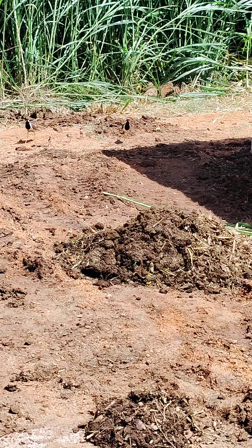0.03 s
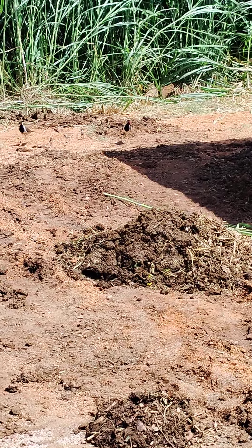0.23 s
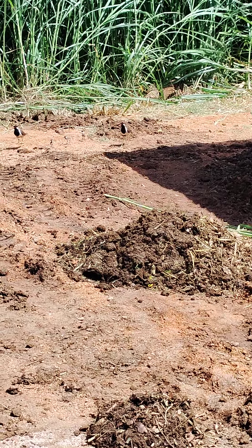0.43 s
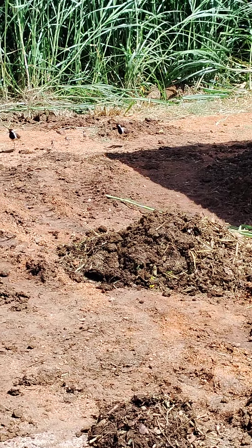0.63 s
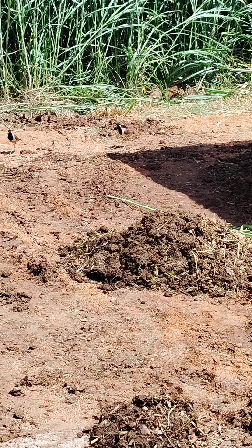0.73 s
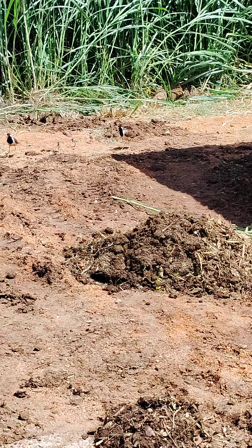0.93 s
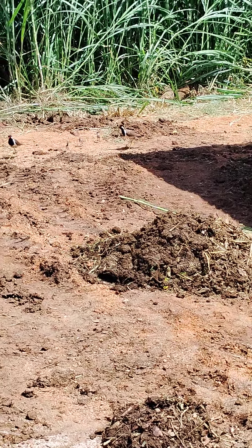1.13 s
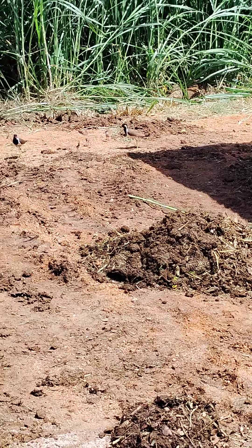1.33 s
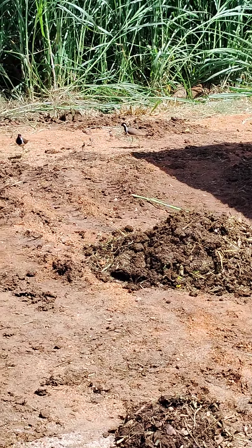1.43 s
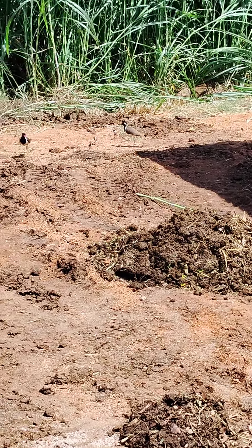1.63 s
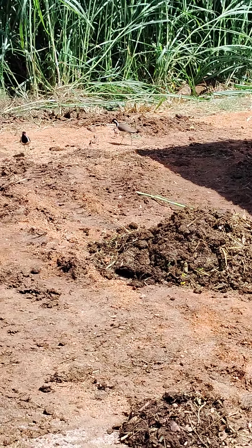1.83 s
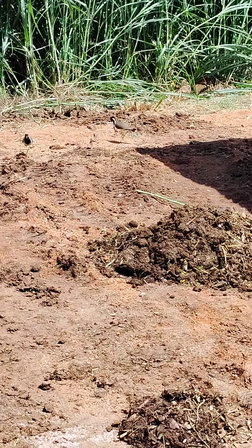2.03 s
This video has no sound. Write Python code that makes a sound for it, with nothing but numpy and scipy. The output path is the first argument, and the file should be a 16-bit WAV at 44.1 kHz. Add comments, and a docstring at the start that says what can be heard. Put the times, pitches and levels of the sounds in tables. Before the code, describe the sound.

Sharp little bird chirps come in small clusters outdoors, above faint steady background noise.

```python
"""First come a far rumble, a faint machine hum and light air on the microphone.
Then red-wattled lapwings call on bare ground in front of a tall green field: short, sharp "kip" notes
that hold their pitch and then break downwards, and one longer whine. Each call is a stack of
harmonics (tones at 1, 2, 3... times its pitch), and the stems scatter it back."""
import sys
import numpy as np
from scipy import signal
from scipy.fft import rfft, irfft
from scipy.io import wavfile

SR = 44100
rng = np.random.default_rng(int(sys.argv[2]) if len(sys.argv) > 2 else 0)


def transcribe(u):
    """Save the signal u as a 16-bit wav file named by the first command-line argument.

    u: samples, shape (n,) or (channels, n), limited to [-1, 1]; the rate is SR.
    q: integer samples, one column per channel.
    """
    v = np.clip(np.atleast_2d(u).T, -1, 1)
    q = np.round(v * 32767).astype(np.int16)
    wavfile.write(sys.argv[1], SR, q)


N = 92036
T = np.arange(N) / SR


def from_db(db):
    """Turn decibels into a number to multiply by."""
    return 10 ** (np.asarray(db) / 20)


def unit_power(x):
    """Scale a signal to an average power of one."""
    return x / np.sqrt(np.mean(x ** 2) + 1e-20)


def at_hz(table, hz):
    """Read between a table's rows, with every octave equally wide."""
    freqs, values = np.transpose(table)
    return np.interp(np.log(hz), np.log(freqs), values)


def panned(db):
    """Left and right gains that make the left side louder by db."""
    gains = from_db(np.array([[.5], [-.5]]) * db)
    return gains / np.sqrt(np.mean(gains ** 2, axis=0))


def drift(rate_hz):
    """A smooth random wobble, about one in size."""
    smooth = signal.butter(2, rate_hz, fs=SR, output="sos")
    return unit_power(signal.sosfilt(smooth, rng.standard_normal(2 * N))[N:])


def noise_band(low, high, alike):
    """Stereo noise between two frequencies; alike runs from 0 (unrelated sides) to 1 (the same)."""
    band = signal.butter(2, [low, min(high, SR / 2 - 1)], "band", fs=SR, output="sos")
    mid, side = signal.sosfilt(band, rng.standard_normal((2, N + SR // 2)))[:, -N:]
    return np.sqrt(1 + alike) * mid + np.sqrt(1 - alike) * side * [[1], [-1]]


def add(out, start, sound):
    """Mix a sound in at its start time in seconds."""
    i = int(start * SR)
    out[:, i:i + sound.shape[1]] += sound[:, :N - i]


def right_later(sound, lag_samples):
    """Let a sound reach the right microphone later."""
    return np.array([sound[0], np.interp(T - lag_samples / SR, T, sound[1])])


# The tone of the air. Each row: frequency in Hz, relative level in dB.
AIR_TONE = [(15, -45), (25, -13.5), (281, -2), (433, -8.5), (495, 0), (537, -8.5), (722, -9.5), (895, -12),
            (1200, -6), (1900, -10), (2300, -12), (2850, -16.5), (5010, -16), (10900, -32), (15500, -46)]
# Where the air sits. Each row: frequency in Hz, left over right in dB.
AIR_BALANCE = [(60, 5), (200, -1.5), (700, 0), (1300, -6), (2400, -5), (4400, -3), (8000, 1)]
# How alike its two sides are. Each row: frequency in Hz, likeness from 0 to 1.
AIR_LIKENESS = [(30, .4), (60, .45), (130, .86), (290, .95), (640, .91), (1410, .55), (3100, .1),
                (8000, .05)]


def far_rumble(level_db=-47, waver_db=2.03):
    """Far rumble and hiss in half-octave bands, each wavering a little."""
    out, edges = 0, 20 * 2 ** np.arange(0, 10.1, .5)
    for low, high in zip(edges, edges[1:]):
        hz = np.sqrt(low * high)
        gain = from_db(at_hz(AIR_TONE, hz) + waver_db * drift(3.3))
        band = noise_band(low, high, at_hz(AIR_LIKENESS, hz))
        out = out + gain * panned(at_hz(AIR_BALANCE, hz)) * band
    return from_db(level_db) * unit_power(out)


# The tones of the hum. Each row: pitch in Hz, level in dB.
HUM_TONES = [(301.5, -70), (490, -61)]


def machine_hum(waver_db=1.5, pitch_wobble=0.0018):
    """A far machine hums faintly, wavering in level and pitch."""
    out = 0
    for hz, db in HUM_TONES:
        gain = from_db(db + waver_db * drift(4.7)) * np.sqrt(2)
        cycles = hz * np.cumsum(1 + pitch_wobble * drift(19)) / SR
        out = out + gain * np.sin(2 * np.pi * cycles)
    return out


# Low puffs. Each row: peak time and width in seconds, frequency in Hz, level in dB, likeness of sides.
PUFFS = [(.08, 0.074, 37.7, -56, 0.23), (.205, 0.016, 71.5, -45, 0.24), (1.283, 0.02, 180, -48, 1)]


def low_puffs():
    """Soft puffs of low noise, an octave wide, swell and fade."""
    out = 0
    for peak, width, hz, db, alike in PUFFS:
        swell = from_db(db) * np.exp(-.5 * ((T - peak) / width) ** 2)
        out = out + swell * unit_power(noise_band(hz / np.sqrt(2), hz * np.sqrt(2), alike))
    return out


# Reflections from the ground, the edge of the field and deep inside it.
# Each row: delay in seconds, level in dB, seconds to fade by 60 dB.
REFLECTIONS = [(.003, -16, 0.03), (0.014, -15.5, 0.17), (0.052, -33, .8)]


def field_echoes(calls, echo_s=.02, echo_db=-19, balance_db=-4):
    """Countless tiny reflections die away, and the wall of stems returns one clear echo."""
    out, t = 0, T[:SR]
    for delay, db, fade_s in REFLECTIONS:
        tail = rng.standard_normal((2, SR)) * (t > delay) * from_db(-60 * t / fade_s)
        tail /= np.sqrt(np.sum(tail ** 2, axis=1, keepdims=True))
        scattered = signal.fftconvolve(calls[1:], tail, axes=1)[:, :N]
        out = out + from_db(db) * panned(balance_db) * scattered
    add(out, echo_s, from_db(echo_db) * calls)
    return out


# The tone of harmonics 5 to 12. Each row: frequency in Hz, boost in dB.
UPPER_TONE = [(5500, 4), (6900, -5.5), (8200, -3.5), (9500, -8.5), (11000, -12.5), (13500, -26),
              (15500, -18)]
# Where the birds sit. Each row: frequency in Hz, left over right in dB.
BIRD_BALANCE = [(1200, -1.5), (2400, -8.5), (3600, -3), (5000, -12), (8000, 0.5), (15000, -1)]
# How far the wave is ahead at the left microphone. Each row: frequency in Hz, lead in radians.
LEFT_LEAD = [(1200, 1.2), (2350, 0.84), (2750, 2.43), (3600, 3.13), (5000, 5.2), (5450, 8.57),
             (8000, 12.46), (15000, 21.36)]
ATTACK_S, RELEASE_S = 0.0022, 0.0067
FLUTTER_HZ, FLUTTER_DB = 170, 1.4


def bird_voice(t, hold_s, pitch, jitter, second_db, third_db, fourth_db, upper_db):
    """A reedy tone with a weak first harmonic; jitter is its wobble as a share of the pitch."""
    jitter = jitter + .016 * np.exp(-t / .004)   # a rough start
    pitch = pitch * (1 + jitter * drift(FLUTTER_HZ)[:len(t)])
    envelope = np.clip(t / ATTACK_S, 0, 1) * np.exp(-np.maximum(t - hold_s, 0) / RELEASE_S)
    envelope *= from_db(FLUTTER_DB * drift(FLUTTER_HZ)[:len(t)])
    levels = [second_db - 24.5, second_db, third_db, fourth_db]
    out, cycles = 0, np.cumsum(pitch) / SR
    for k in range(1, 13):
        hz = k * pitch
        db = levels[k - 1] if k <= len(levels) else upper_db + at_hz(UPPER_TONE, hz)
        lead = np.array([[1], [0]]) * at_hz(LEFT_LEAD, np.median(hz[t <= hold_s]))
        phase = 2 * np.pi * (k * cycles + rng.random()) + lead
        out = out + from_db(db) * panned(at_hz(BIRD_BALANCE, hz)) * np.sin(phase)
    return envelope * out


# The path of the whine. Each row: time in seconds, pitch in Hz, level of harmonic 2 in dB.
WHINE_PATH = [(.679, 1182, -28.5), (.700, 1124, -28), (0.724, 1161, -34), (.748, 1079, -28.5),
              (0.769, 1084, -37), (0.786, 1026, -43), (.803, 981, -30.5), (.820, 1056, -35),
              (0.835, 1024, -38.5)]


def whine(jitter=0.013):
    """A second bird draws out one note that sinks, growing duller, and lifts near the end."""
    times, hz, db = np.transpose(WHINE_PATH)
    start, length = times[0], times[-1] - times[0]
    t = T[T < length + 10 * RELEASE_S]
    level = np.interp(start + t, times, db)
    pitch = np.interp(start + t, times, hz)
    fall = (hz.max() - pitch) / np.ptp(hz)   # 0 at the highest pitch, 1 at the lowest
    third, fourth, upper = level - 7 - 4 * fall, level - 1.5 - 12 * fall, level - 21 - 17 * fall
    out = np.zeros((2, N))
    add(out, start, bird_voice(t, length, pitch, jitter, level, third, fourth, upper))
    return out


# The "kip" notes. Each row: start and length in seconds, first and end pitch in Hz,
# then levels in dB for harmonics 2, 3, 4 and the higher ones.
KIP_NOTES = [(0.5049, 0.0058, 1192, 1167, -35.5, -32.5, -31, -49),
             (0.533, 0.028, 1238, 1118, -29, -31.5, -33, -46.5),
             (0.7045, .035, 1382, 1184, -22.5, -25.5, -24, -36.5),
             (1.029, 0.03, 1370, 1168, -24.5, -28, -25, -35), (1.648, .032, 1263, 1125, -27, -26, -26, -39),
             (1.719, 0.029, 1213, 1124, -29, -29.5, -38, -49.5),
             (1.907, 0.021, 1070, 1003, -36, -33.5, -37.5, -57)]
SAG_SHARE, BREAK_POWER = 0.13, 3.28   # the steady part of the fall; how late the rest comes
SWELL_DB, FADE_DB, UPPER_FADE_DB = 3.5, 5.5, 20
HOARSE_DB, HOARSE_BAND_HZ = -6, (720, 7400)   # the level is relative to the higher harmonics


def kips(hold_share=0.89):
    """Each note holds its pitch, then breaks downwards, growing hoarser and duller as it dies."""
    out = np.zeros((2, N))
    for start, length, first_hz, end_hz, second, third, fourth, upper in KIP_NOTES:
        t = T[T < length + 10 * RELEASE_S]
        progress = t / length
        fall = np.minimum(SAG_SHARE * progress + (1 - SAG_SHARE) * progress ** BREAK_POWER, 2)
        pitch = first_hz + (end_hz - first_hz) * fall
        jitter = 0.0053 + .012 * fall
        swell = SWELL_DB * np.exp(-((progress - 0.87) / .12) ** 2)
        levels = (second + swell, third - FADE_DB * fall, fourth - FADE_DB * fall,
                  upper - UPPER_FADE_DB * fall)
        add(out, start, bird_voice(t, hold_share * length, pitch, jitter, *levels))
        # a hoarse rush of noise as the pitch breaks
        rush = unit_power(noise_band(*HOARSE_BAND_HZ, alike=0))[:, :len(t)]
        rush *= panned(at_hz(BIRD_BALANCE, np.mean(HOARSE_BAND_HZ)))
        burst = np.exp(-((progress - 0.79) / 0.28) ** 2)
        add(out, start, from_db(upper + HOARSE_DB) * burst * rush)
    return out


def scene():
    """Mix the far sounds, the puffs, the field's echoes and the birds."""
    calls = kips() + whine()
    far_sounds = right_later(far_rumble() + machine_hum(), lag_samples=7)
    return far_sounds + field_echoes(calls) + low_puffs() + calls


TREBLE_FROM_HZ, TREBLE_LEAD_S, CUTOFF_HZ = 6000, 0.0052, 15600


def record(dry):
    """The recorder passes the treble a little sooner than the rest and cuts off the very top."""
    hz = np.arange(N // 2 + 1) * SR / N
    lead = np.exp(2j * np.pi * hz * TREBLE_LEAD_S * (hz > TREBLE_FROM_HZ))
    shifted = irfft(rfft(dry) * lead, N)
    return signal.sosfilt(signal.ellip(10, .2, 70, CUTOFF_HZ, fs=SR, output="sos"), shifted)


dry = scene()
out = record(dry)
transcribe(out)
```